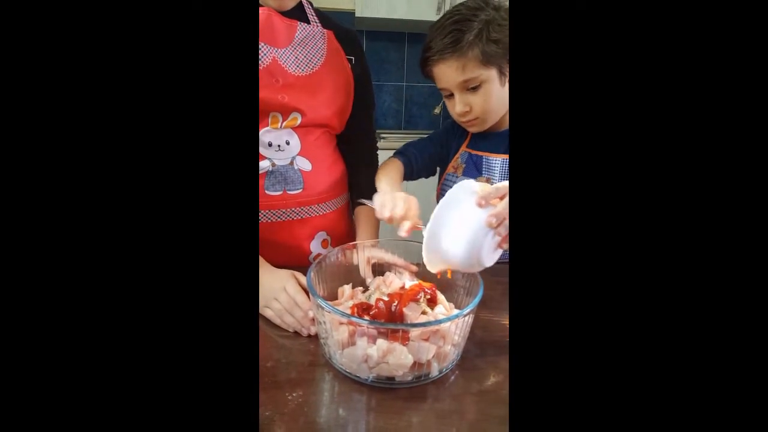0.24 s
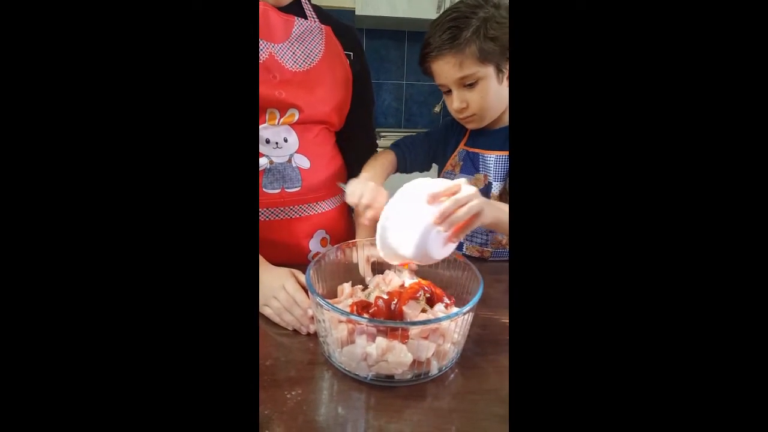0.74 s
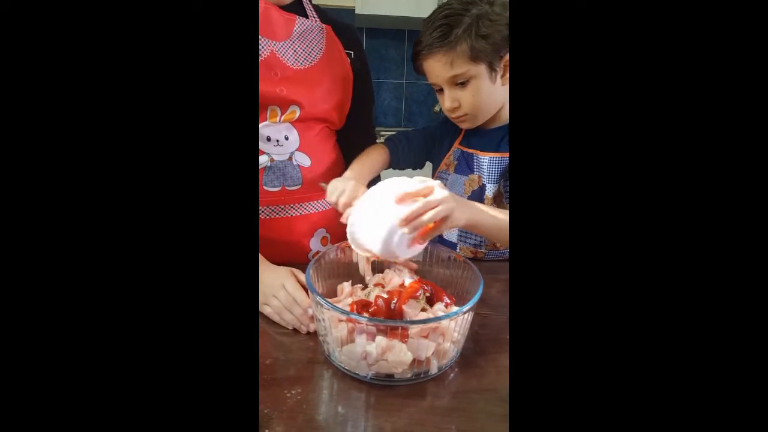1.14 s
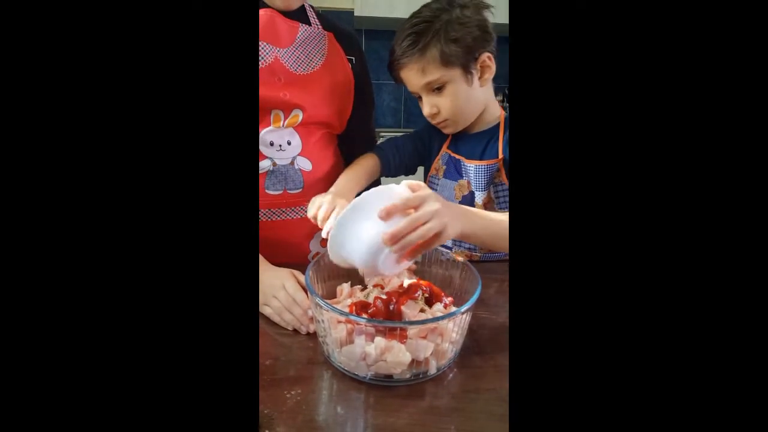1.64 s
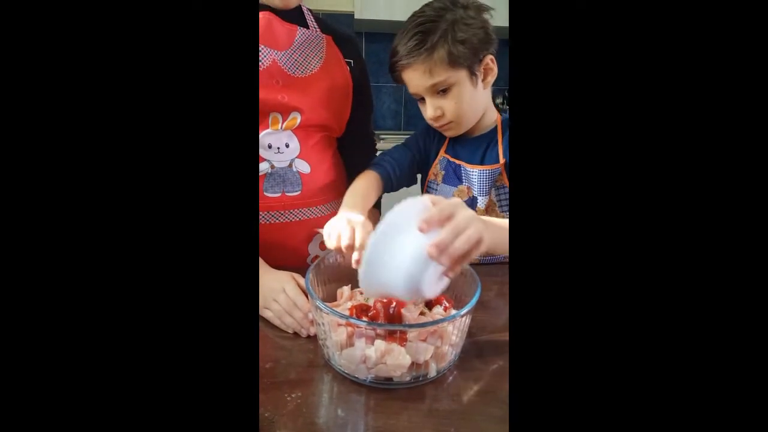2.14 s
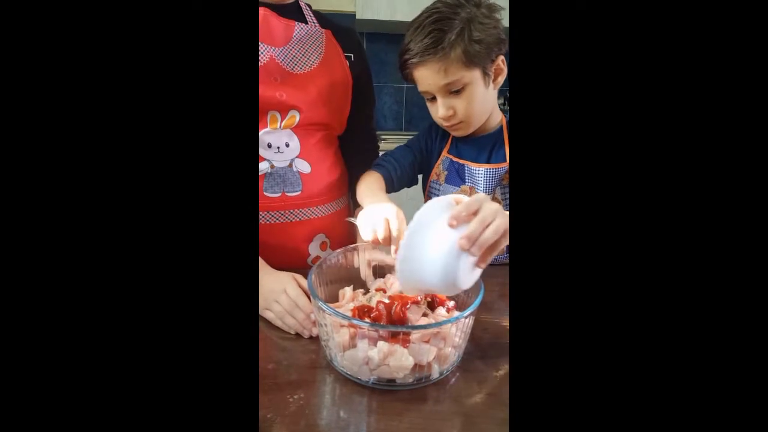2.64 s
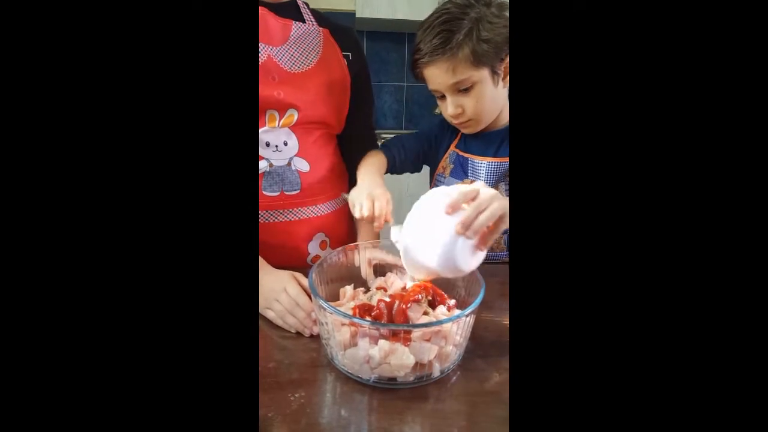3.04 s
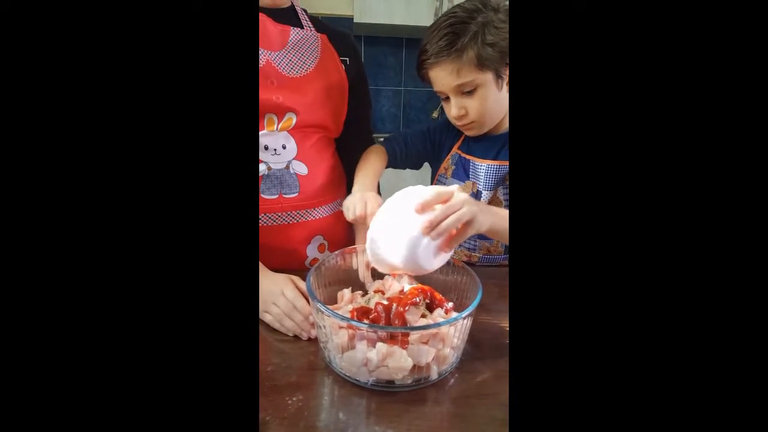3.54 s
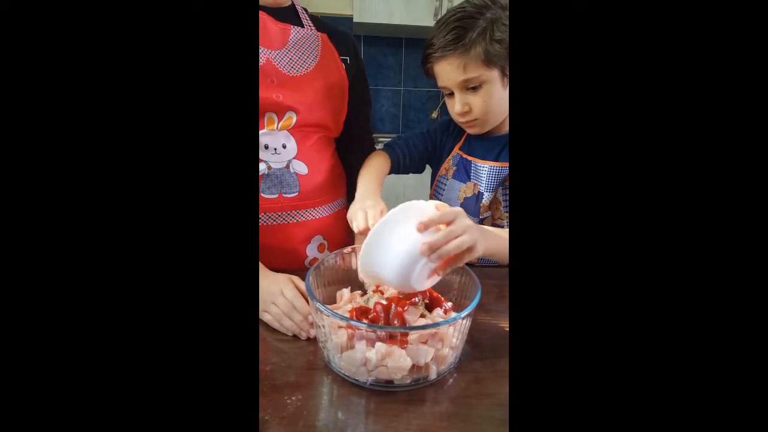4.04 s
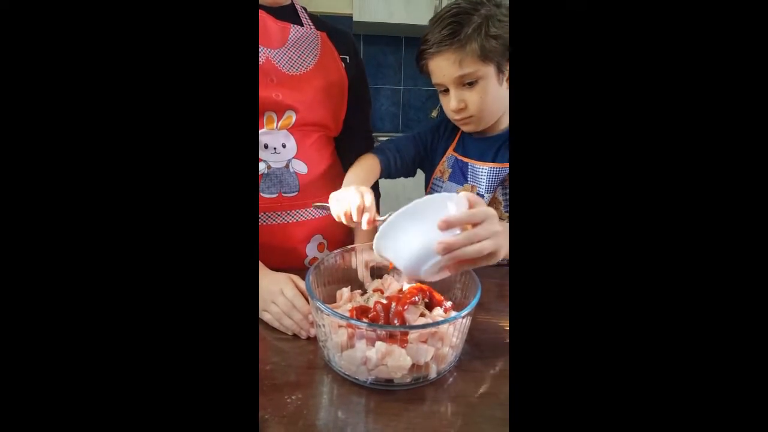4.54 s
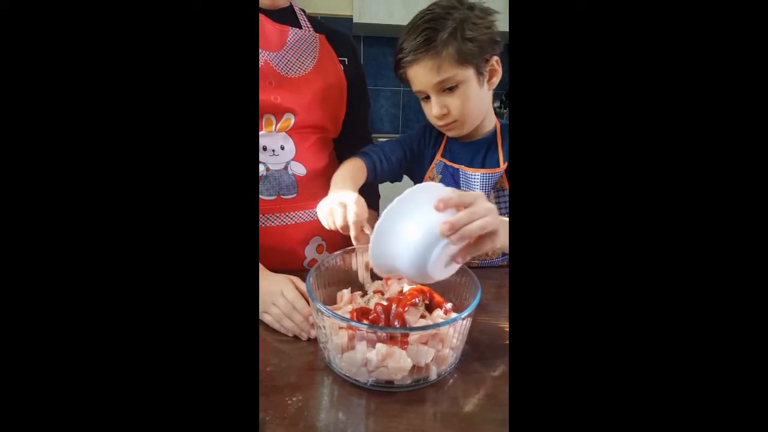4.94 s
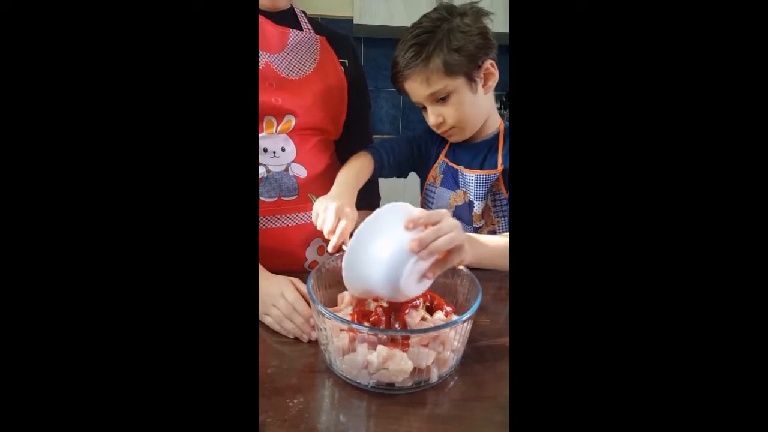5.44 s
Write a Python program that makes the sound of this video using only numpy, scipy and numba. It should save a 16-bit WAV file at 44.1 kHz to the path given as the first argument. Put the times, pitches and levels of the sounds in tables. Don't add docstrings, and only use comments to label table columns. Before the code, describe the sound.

A steel spoon strikes a small china bowl held in the hand, about three knocks per second on average, unevenly spaced. Each is a sharp, dry clack with a short ceramic ring, followed by bright kitchen reflections. A large glass bowl is bumped early on, rattling low and ringing briefly. Short scrapes slip between knocks; the last second is busiest and loudest. Close phone stereo, with quiet room tone and fridge hum.

```python
import sys
import numpy as np
from scipy import signal
from scipy.io import wavfile
from scipy.ndimage import uniform_filter1d
from numba import njit

SR = 44100
rng = np.random.default_rng(int(sys.argv[2]) if len(sys.argv) > 2 else 0)


def waveform_to_disk(signal):
    frames = np.transpose(np.atleast_2d(signal))
    scaled = np.clip(frames, -1, 1) * 32767
    samples = np.round(scaled).astype(np.int16)
    wavfile.write(sys.argv[1], SR, samples)


def volts(x):
    e = np.asarray(x, float) / 20
    return 10 ** e


N = 251370

# f/Hz, density/dB per Hz
ROOM_TONE = [(15, -42), (25, -12.5), (158, -2.5), (207, -6), (353, -9.5), (768, -23.5), (855, -19),
             (4260, -36.5), (15000, -42.5)]
# f/Hz, width/Hz, level/dB re room tone
FRIDGE_DRONES = [(48.3, 11, -12.5), (95, 5.6, -9), (146, 20, -12.5), (644, 31, -15)]
# f/Hz, t60/s, level/dB
KITCHEN_DECAY = [(150, .5, -31.5), (382.5, 0.59, -10), (1058, 0.52, -8), (2137, 0.51, -11),
                 (3800, 0.46, -12), (6800, 0.42, -16), (10000, 0.4, -11.5)]
# t/s, smear/s, left/dB, right/dB
WALL_ECHOES = [(.0022, 0.00054, -6, -2), (.0065, 0.0013, -13.5, -9), (.0125, 0.0017, -12, -11.5),
               (.0185, .002, -16.5, -19), (.031, 0.0022, -20, -17.5)]

GLASS_BOOM_MODES = [(142, -1.5, 0.33, 0, 0.18), (206, 1, 0.26, -0.65, .3), (256.5, 0, 0.52, -2.3, .4),
                    (313.8, -4, 0.16, -2, 0.22)]
GLASS_WALL_MODES = [(443, -12.5, 0.079, 10, 0.39), (563, -0.5, 0.25, 0.5, 0.87),
                    (695, -7, 0.077, 7.5, 0.72), (843, -15.5, 0.052, -10, 0.72), (1182, -10, 0.11, -7, 2),
                    (1492, 0.5, 0.021, -1, 1.2)]
GLASS_HIGH_MODES = [(2076, -1, 0.28, 0.0033, 1.2), (2730, -13.5, 0.092, 0.0038, 1.2)]
TABLE_MODES = [(68, -38, 0.073, 1, .2), (145, -25, .08, 6, 0.31), (278, -9, 0.093, -4, 0.55),
               (382.4, 4.5, 0.035, -2.5, 0.48)]
WALL_MODES = [(1770, -7, 0.0076, -4, 2.7), (2273, 6.5, 0.0085, -2.5, 0.75), (2436, -1.5, 0.02, -5.5, 1.3),
              (2615, 4.5, 0.0065, 4.5, 1.77), (2900, -7.5, 0.038, -3, 3.2)]
BELLY_MODES = [(520, -13, 0.011, 1, .6), (689, 1, 0.016, -1, .8), (1001, -0.5, 0.011, 2, 1.2),
               (1169, -3, 0.052, 3.5, 1.8), (1314, 1.5, 0.023, 8, 1.2), (1661, -1.5, 0.035, -5.5, 1.58)]
CRACK_MODES = [(3870, -3, 0.044, 8, 1.6), (4202, 0, 0.016, -5, 1.6), (4970, 3.5, 0.0086, 1.5, 1.6),
               (6280, -4.5, 0.024, -1.5, 1.3), (7326, -3, 0.0092, 3.5, 1.3), (8200, -13, 0.0041, 8, 1.2),
               (11700, -16, 0.0073, -1, 1.2), (14300, -14.5, .005, -5, 1.2)]
RIM_MODES = [(1245.5, -11.5, 0.082, 2, 2.2), (3233, 2.5, 0.033, -2, 1.27)]
UPPER_RIM_MODES = [(5677, 6.5, 0.014, 7.1, 1.43), (5290, -17.5, 0.076, 9.9, 0.57)]
SPOON_MODES = [(8070, 2, 0.012, 0.99, 1.1), (8610, -4.5, 0.013, 0.69, 0.43), (9215, -2.5, 0.018, 1, 0.63)]
TIP_MODES = [(10765, -7.5, 0.016, 0.0039, 2.2), (12190, 1.5, 0.046, 0.034, 1.1),
             (13930, -0.5, 0.079, 0.0074, 1.8), (13520, -27, .04, 0.014, 1.1)]

# level/dB re knock, decay/s, low/Hz, high/Hz, first snap/dB re grit
CLICK_BANDS = [(-9, .0012, 750, 4600, 12.5), (-22.5, .001, 4000, 7500, 9.5), (-27, .0015, 8500, 16000, 0.5)]
# t/s, wall/dB, boom/dB re wall, high ring/dB re wall
NUDGES = [
    (0.272, -20, -8.5, 3.5),
    (0.284, -20.5, -11, -17),
    (0.294, -21.5, -5, 0),
    (0.312, -33.5, 4, -5.5),
    (0.384, -30, -14.5, -4.5),
    (3.012, -34, -8, -2.5),
]
# t/s, length/s, knock/dB, ring/dB re knock
SCRAPES = [
    (0.36, 0.029, -31.5, -12.5),
    (2.297, 0.042, -51, -4.5),
    (2.92, 0.024, -50, -2),
    (3.212, 0.1, -47, -23),
    (3.476, 0.03, -31.5, 0.5),
    (3.897, 0.087, -38, -10.5),
    (4.412, 0.051, -31.5, -8),
]
# hollow belly/dB, free rim/dB, spoon ring/dB
CONTACTS = [(.2257, -15, -5.5, -16.5, -28.5), (.7211, -19.5, -21, 0, -9), (1.2155, -11, -6.5, -7, -12),
            (1.5706, -13.5, -1.5, -20.5, -7), (1.6845, -14.5, -10, -6.5, -11.5),
            (2.095, -14.5, -0.5, -16, -9.5), (2.6735, -24.5, 4.1, -22, 0.5),
            (2.7295, -15.5, -14, -14.5, -29), (3.3035, -13, -2.5, -8, -19.5),
            (3.7648, -22.5, -20.5, 10.5, 4), (4.2295, -24, -17.5, 6, -3), (4.788, -20, -12.5, 3, -8.5),
            (4.8345, -14, -0.5, -17.5, -1.5), (4.9378, -6, -20, -12, -9.5), (5.2102, -15, 4, -22, -1.6),
            (5.2943, -12, -7, -16, -36), (5.498, -30.5, -23, 10, -7.5)]
# free rim/dB, spoon ring/dB
MORE_CONTACTS = [(0.2938, -23, -3.6, -12), (2.309, -57, 17.5, -22.5), (2.3525, -44, 2.5, -20.5),
                 (2.7698, -25.5, -11, -34), (2.9343, -42, 6, -17), (2.945, -47, 14.5, -1), (3.503, -37, 9, -7),
                 (3.9559, -45.5, 9.5, -19.5), (4.256, -31, -6, -7.5), (4.414, -34, -1, -13),
                 (4.451, -34.5, 3.5, -12), (4.802, -19, -19.5, -22.5), (4.8427, -14, -19.5, -17.5)]
# f/Hz, width/Hz, depth/dB
PORT_DIP = (9500, 750, -10)

ROOM_TONE_DB = -60
SPOT_DB = 2.5


def band(x, lo_hz, hi_hz):
    return signal.sosfilt(signal.butter(2, [lo_hz, hi_hz], "band", fs=SR, output="sos"), x)


def room_tone():
    table_hz, table_db = np.transpose(ROOM_TONE)
    out = 0
    for hz in 28 * 2 ** np.arange(0, 9.1, 1 / 3):
        mid, side, slow = rng.standard_normal((3, N))
        waver = uniform_filter1d(uniform_filter1d(slow, 4000), 4000) * 77
        db = np.interp(np.log(hz), np.log(table_hz), table_db) + 3.6 * waver
        width = np.clip(0.15 + hz / 1500, 0, 1)
        both = mid + width * side * np.array([[1], [-1]])
        out = out + volts(db) * band(both, hz / 2 ** (1 / 6), hz * 2 ** (1 / 6))
    return out * volts(ROOM_TONE_DB) / out.mean(0).std()


def fridge():
    out = np.zeros(N)
    for hz, width_hz, db in FRIDGE_DRONES:
        drone = band(rng.standard_normal(N), hz - width_hz / 2, hz + width_hz / 2)
        out += volts(db) * drone / np.sqrt(2 * width_hz / SR)
    return volts(ROOM_TONE_DB) * out


def kitchen(x):
    tail_s, build_s, tail_db = 0.9, 0.0061, 8.5
    t = np.arange(int(tail_s * SR)) / SR
    tail = 0
    for hz, t60, db in KITCHEN_DECAY:
        part = band(rng.standard_normal((2, len(t))), hz / 1.614, hz * 1.214)
        tail = tail + volts(db - 60 * t / t60) * part / np.sqrt(t60 * SR / 14)
    tail = tail * (1 - np.exp(-(t / build_s) ** 2)) * volts(tail_db)
    for s, smear, left_db, right_db in WALL_ECHOES:
        burst = np.exp(-((t - s) / smear) ** 2) / np.sqrt(smear * SR)
        tail += burst * rng.standard_normal(len(t)) * volts(np.array([[left_db], [right_db]]))
    return x + signal.fftconvolve(x, tail, axes=1)[:, :N]


@njit
def swing(push, turn, fade):
    y, z = np.zeros(len(push)), 0j
    for i in range(len(push)):
        z = z * fade + push[i] * np.conj(turn[i]) + 1e-30
        y[i] = (z * turn[i]).imag
    return y


def ring(modes, s, db, scatter_db=SPOT_DB, pan_db=0, bend=1):
    out = np.zeros((2, N))
    at = np.clip(np.round(np.asarray(s) * SR).astype(int), 0, N - 1)
    spot = rng.standard_normal((len(at), len(modes)))
    for k, (hz, mode_db, t60, lean_db, lead_rad) in enumerate(modes):
        turn = np.exp(2j * np.pi * hz / SR * np.cumsum(bend * np.ones(N)))
        fade = np.exp(-np.log(1000) / (t60 * SR))
        lag = int(round(lead_rad * SR / (2 * np.pi * hz)))
        blow_db = db + mode_db + scatter_db * spot[:, k]
        for ch, side in enumerate((0.5, -0.5)):
            hit = np.minimum(at + ch * lag, N - 1)
            size = (-1) ** k * volts(blow_db + side * (lean_db + pan_db))
            out[ch] += swing(np.bincount(hit, size, N), turn, fade)
    return out


def glass():
    s, wall_db, boom_db, high_db = np.transpose(NUDGES)
    out = ring(GLASS_BOOM_MODES, s, wall_db + boom_db - 6.5, 3.0)
    out += ring(GLASS_WALL_MODES, s, wall_db - 6.5, 3.0)
    return out + ring(GLASS_HIGH_MODES, s, wall_db + high_db - 6.5, 3.0)


def slips():
    slips_per_scrape = 45
    rows = []
    for start, length, db, ring_db in SCRAPES:
        at, size = rng.random((slips_per_scrape, 2)).T
        swell_db = 20 * np.log10(np.sin(np.pi * at) + 0.066)
        slip_db = db - 4.5 * np.log(size) + swell_db - 21.5
        rows.append(np.array([start + length * at, slip_db, slip_db + ring_db]).T)
    return np.vstack(rows).T


def click(s, db):
    t = np.arange(int(0.01 * SR)) / SR
    at = (s * SR).astype(int)
    both = 0
    for band_db, decay_s, lo_hz, hi_hz, snap_db in CLICK_BANDS:
        part = np.zeros(N + len(t))
        snap = volts(snap_db) * (t == 0)
        for i, gain in zip(at, volts(db + band_db)):
            grit = rng.standard_normal(len(t)) * np.exp(-t / decay_s)
            part[i:i + len(t)] += gain * (grit - snap)
        both = both + band(part[:N], lo_hz, hi_hz)
    return both * volts(np.array([[0.5], [-0.5]]) * 3.0)


def china():
    more_belly_db, left_db, wall_bottom_hz = -8, 1.3, 238
    rim_detune, wall_detune = 0.01, 0.052

    more = [(s, db, more_belly_db, rim, spoon) for s, db, rim, spoon in MORE_CONTACTS]
    s, db, belly_db, rim_db, spoon_db = np.transpose(sorted(list(CONTACTS) + more))
    slip_s, slip_db, sing_db = slips()
    every_s = np.r_[s, slip_s]

    jolt_db = db - 16.5 + 0.64 * belly_db
    crack_db = db - 10.5 + 0.21 * rim_db
    tip_db = db - 18 + 0.28 * spoon_db
    upper_rim_db = db - 1.5 + 0.74 * rim_db + 0.58 * spoon_db

    latest = np.maximum(np.searchsorted(s * SR, np.arange(N), "right") - 1, 0)
    grip = rng.standard_normal((len(s), 2))[latest].T
    rim_bend = 1 + rim_detune * grip[0]
    wall_bend = 1 + wall_detune * np.tanh(grip[1])

    out = click(s, db)
    # modes, contact dB, slip offset dB
    for modes, blow_db, less_db in ((WALL_MODES, db, 0),
                                    (BELLY_MODES, db + belly_db, -3),
                                    (CRACK_MODES, crack_db, -6)):
        every_db = np.r_[blow_db, slip_db + less_db] - 5
        out += ring(modes, every_s, every_db, pan_db=left_db, bend=wall_bend)
    for modes, blow_db, less_db, bend in ((RIM_MODES, db + rim_db, 0, rim_bend),
                                          (UPPER_RIM_MODES, upper_rim_db, -3, 1),
                                          (SPOON_MODES, db + spoon_db, -6, 1),
                                          (TIP_MODES, tip_db, -12, rim_bend)):
        every_db = np.r_[blow_db, sing_db + less_db]
        out += ring(modes, every_s, every_db, pan_db=left_db, bend=bend)
    out = signal.sosfilt(signal.butter(2, wall_bottom_hz, "high", fs=SR, output="sos"), out)
    return out + ring(TABLE_MODES, s, jolt_db - 4)


def scene():
    return kitchen(china() + glass()) + room_tone() + fridge()


def low_pass(x):
    return signal.sosfilt(signal.butter(12, 15120, fs=SR, output="sos"), x)


def record(dry):
    top_hz, bottom_hz = 14700, 40
    hz, width_hz, dip_db = PORT_DIP
    notch = signal.lfilter(*signal.iirpeak(hz, hz / width_hz, SR), dry)
    x = dry - (1 - volts(dip_db)) * notch
    x = signal.sosfilt(signal.butter(12, top_hz, fs=SR, output="sos"), x)
    x = signal.sosfilt(signal.butter(2, bottom_hz, "high", fs=SR, output="sos"), x)
    mix = np.tanh(0.97 * x) / 0.77
    return low_pass(mix)


dry = scene()
out = record(dry)
waveform_to_disk(out)
```